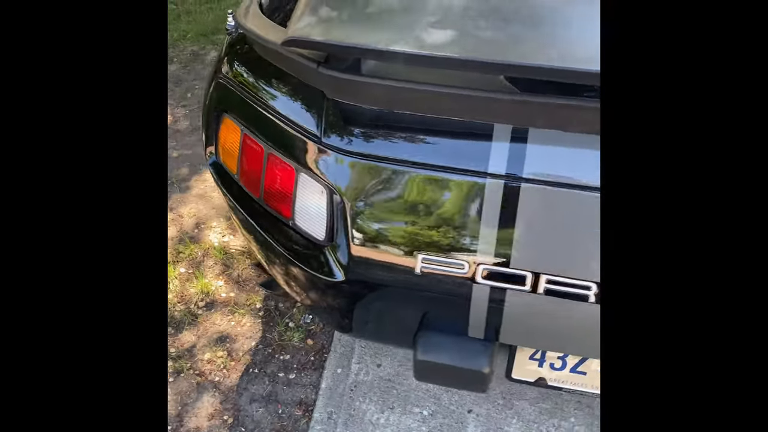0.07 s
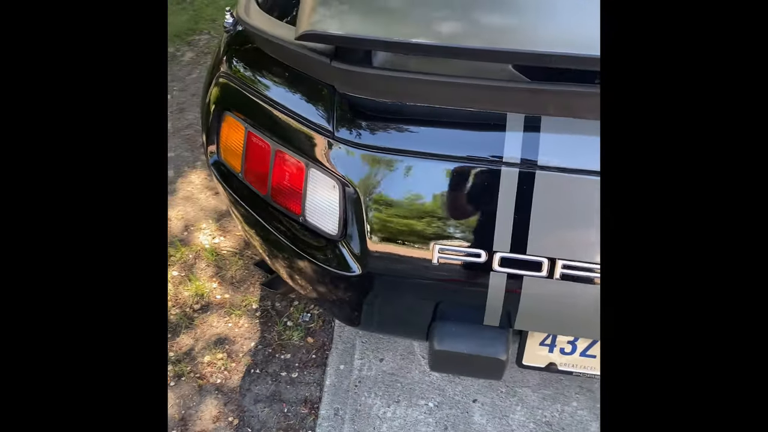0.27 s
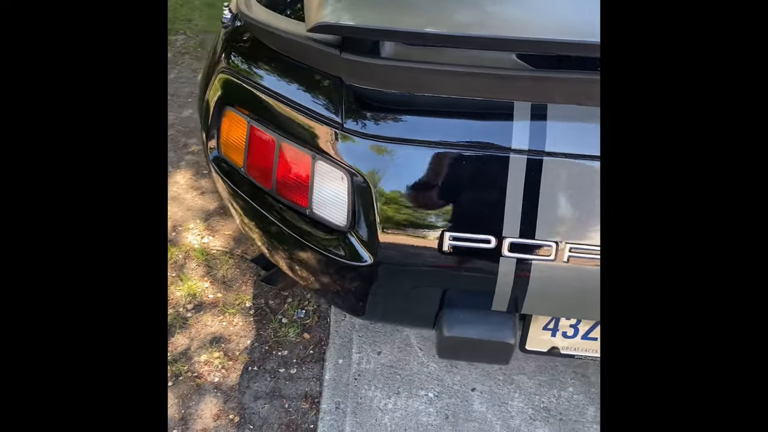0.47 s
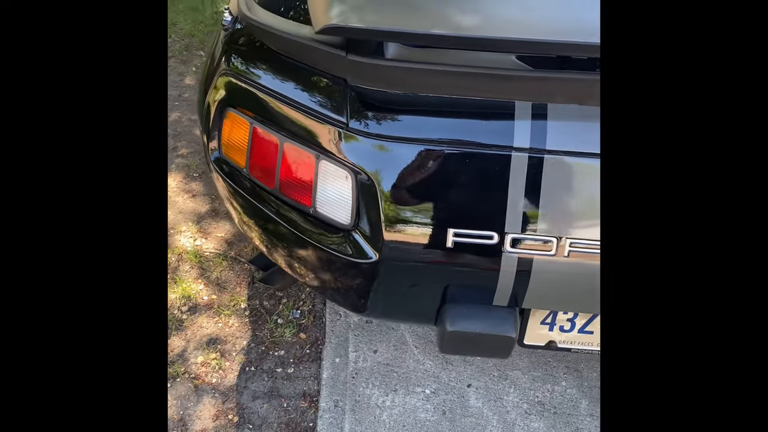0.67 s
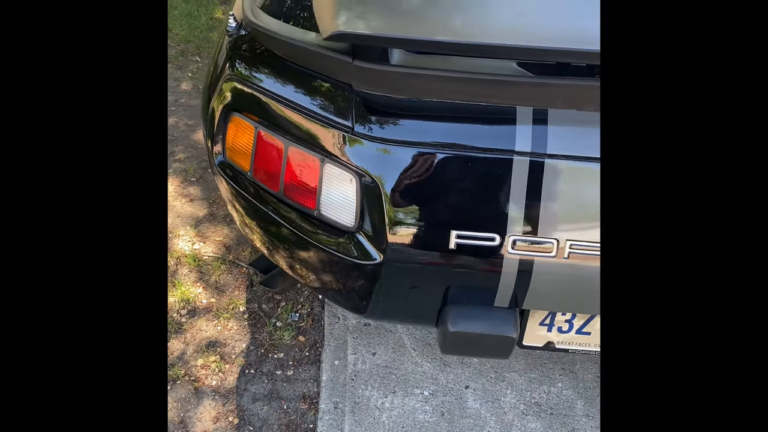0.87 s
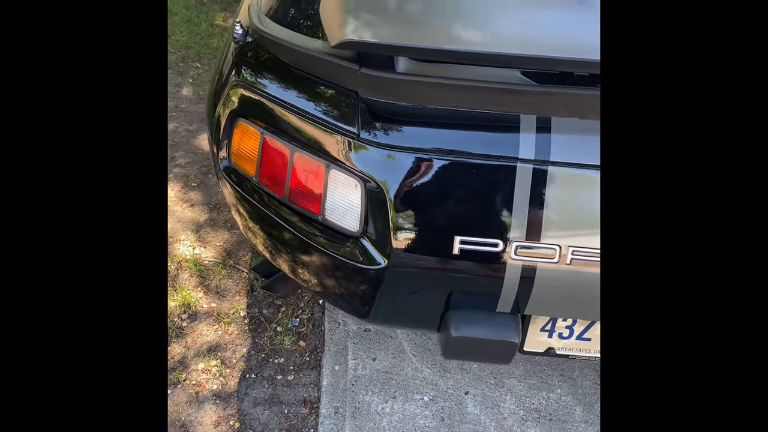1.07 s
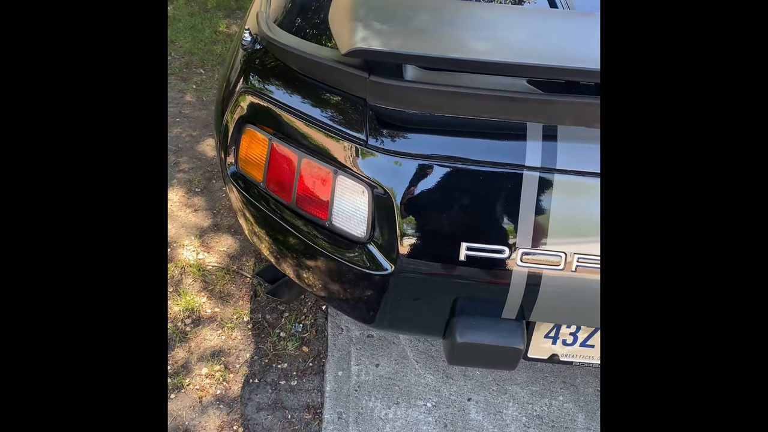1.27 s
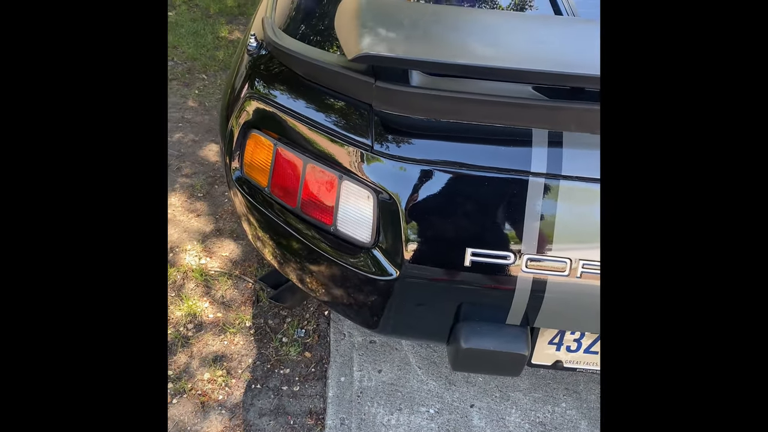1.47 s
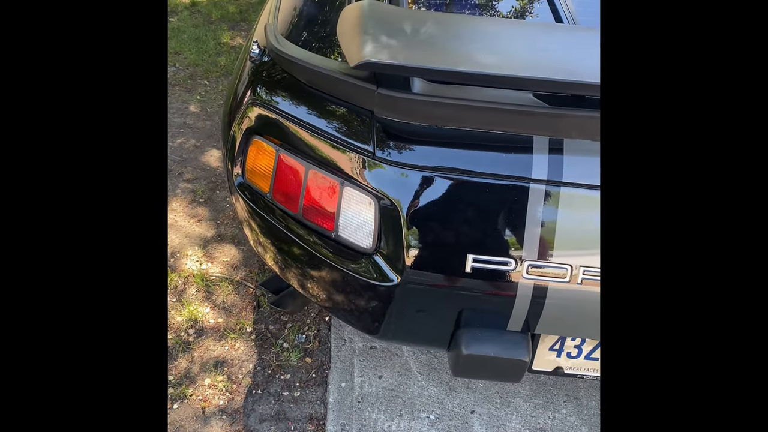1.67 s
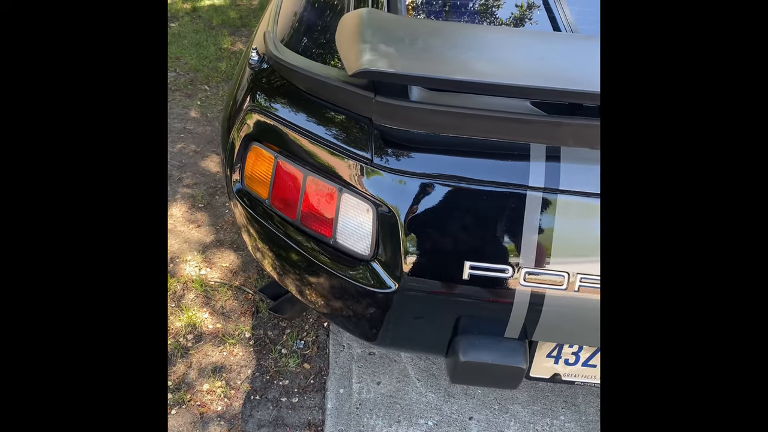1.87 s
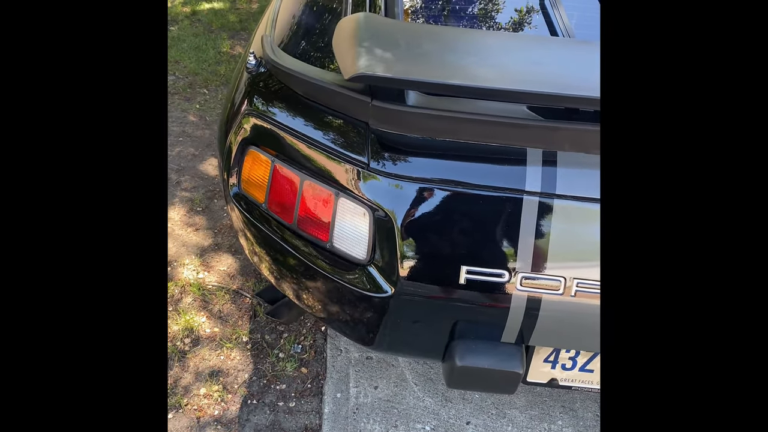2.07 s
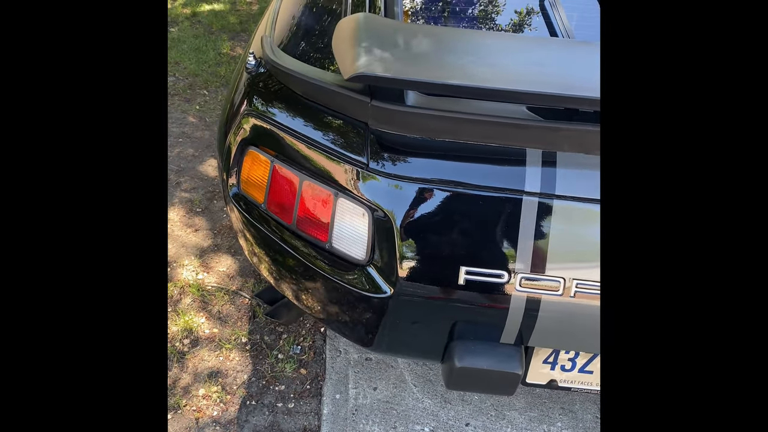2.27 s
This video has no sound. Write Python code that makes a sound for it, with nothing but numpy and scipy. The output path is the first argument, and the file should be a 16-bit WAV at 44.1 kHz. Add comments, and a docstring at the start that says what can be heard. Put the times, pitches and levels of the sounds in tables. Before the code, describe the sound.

A big eight-cylinder car engine idles throughout, deep and lumpy with a hollow hooting burble, soft hiss and faint whine; two short gritty shoe scuffs come early. Outdoors, handheld phone close behind the tailpipe.

```python
"""A V8 idles for 2.3 s, heard from just behind the parked car; its cycle of eight firings comes 8.3 times a second.
From the start, uneven firings ring the silencer (deep throb) and the tailpipe (hollow burble, a hoot per cycle).
With them panels buzz as shaken noise, the belt drive whines in thin tones, gas hisses as coloured noise
and, once per cycle, a valve ticks faintly as a decaying noise burst.
At 0.19 s and 0.63 s a shoe scuffs on grit, in dense tiny clicks with cracking stones; a lone stone cracks at 2.05 s."""
import sys
import numpy as np
from scipy import signal
from scipy.fft import rfft, irfft, next_fast_len
from scipy.io import wavfile
from scipy.ndimage import uniform_filter1d

SR = 44100
rng = np.random.default_rng(int(sys.argv[2]) if len(sys.argv) > 2 else 0)


def to_wav(sig):
    """Store sig (one row per channel, or 1-D mono) as 16-bit WAV at the path in sys.argv[1].

    Samples outside -1..1 are clipped; the rate is SR.
    """
    pcm = np.clip(np.atleast_2d(sig), -1, 1) * 32767
    pcm = np.round(pcm).astype(np.int16)
    wavfile.write(sys.argv[1], SR, pcm.T)  # frames by channels


N = 102664
T = np.arange(N) / SR
SIZE = next_fast_len(N + SR)
FREQS = np.maximum(np.arange(SIZE // 2 + 1) * SR / SIZE, 1e-3)  # Hz, kept off zero for the logarithm

# Engine speed. Each row: time in seconds, cycles of eight firings per second.
SPEED = [(0, 8.26), (.15, 8.25), (.35, 8.205), (.65, 8.265), (1, 8.26), (1.2, 8.22), (1.45, 8.27),
         (1.7, 8.34), (1.95, 8.285), (2.33, 8.3)]
# Cylinders in firing order. Each row: lag down the pipe in ms, push into the silencer in dB,
# sharp edge into the tailpipe in dB.
CYLINDERS = [(8.7, -23, 0), (8.9, 3.7, 4.6), (10.6, 3.2, .4), (4.9, -1.5, 3.8), (9.5, 3.7, -12.5),
             (10.3, -9.5, 5.2), (9, 6.9, -.5), (10.3, -13.6, -7.5)]
# Level balance of the two microphone ports. Each row: frequency in Hz, left minus right in dB.
PORT_BALANCE = [(300, .2), (450, 1.5), (700, -4.5), (1300, -8), (1900, -1.5), (2400, -0.6), (8000, .1)]


def undb(db):
    """Decibels to gain."""
    return 10 ** (np.asarray(db) / 20)


def level(x, db):
    """Scale to an rms level in dB."""
    return x * undb(db) / np.sqrt(np.mean(x ** 2))


def curve(points, t):
    """Straight lines through (s, value) points."""
    return np.interp(t, *np.array(points).T)


def across(points):
    """(Hz, value) points joined on a log-frequency axis."""
    hz, value = np.array(points).T
    return np.interp(np.log(FREQS), np.log(hz), value)


def through(x, response):
    """Filter by a frequency response."""
    return irfft(rfft(x, SIZE) * response, SIZE)[..., :N]


def resonances(table):
    """Summed response of steep resonances (Hz, width Hz, peak dB, polarity): each band-pass acts twice."""
    response = 0
    for hz, width_hz, db, polarity in table:
        band_pass = 1 / (1 + 1j * (FREQS ** 2 - hz ** 2) / (FREQS * width_hz))
        response = response + np.sign(polarity) * undb(db) * band_pass ** 2
    return response


def walk(rate_hz):
    """Random drift of unit rms: straight lines between rate_hz chance values per second."""
    step = int(SR / rate_hz)
    held = np.repeat(rng.standard_normal(N // step + 1), step)
    return level(uniform_filter1d(held, step)[:N], 0)


def pulses(times_s, sizes):
    """Clicks shared between neighbouring samples; those before zero wrap round and ring on into the start."""
    out = np.zeros(SIZE)
    whole = np.floor(times_s * SR).astype(int)
    part = times_s * SR - whole
    np.add.at(out, whole % SIZE, sizes * (1 - part))
    np.add.at(out, (whole + 1) % SIZE, sizes * part)
    return out


def pan(db):
    """Left and right gains for a left-minus-right level in dB."""
    return undb(np.array([[1], [-1]]) * db / 2)


def ports():
    """Phase and level differences of the two microphone ports, split evenly between left and right."""
    # Each row: frequency in Hz, phase by which left leads in radians.
    port_phase = [(30, -.03), (70, -.045), (130, -.13), (270, -.38), (395, -1), (540, -1.9), (720, -2)]
    phase = np.exp(np.array([[.5j], [-.5j]]) * across(port_phase))
    return phase * pan(across(PORT_BALANCE))


def exhaust(t, turns):
    """Each firing pushes the silencer, and its sharp edge rings the tailpipe; no two are quite alike."""
    # Resonances. Each row: frequency in Hz, width of one pass in Hz, peak gain in dB, polarity.
    silencer = [(46, 32, 14.5, -1), (67.8, 27.8, 37, 1), (79.63, 20.9, 41.5, -1), (113.66, 7, 31, 1),
                (141.2, 39, 13.5, 1)]
    tailpipe = [(144.5, 11.7, 17, -1), (181.9, 3.4, 13.5, 1), (217.6, 26.3, 22, 1), (254.5, 3.1, 25, -1),
                (270.9, 9, 30.5, 1), (278.6, 38, 16.5, -1), (318, 17, 20, -1), (400.3, 30.5, 15.5, -1),
                (539, 14, 6.5, 1), (681, 54, 0.5, 1), (724.6, 35, 0, 1)]
    push_scatter_db, edge_scatter_db, jitter_ms = 0.9, 1.2, 0.14
    count = len(CYLINDERS)
    firing = np.arange(np.ceil(turns[0] * count), turns[-1] * count).astype(int)
    lag_ms, push_db, edge_db = np.array(CYLINDERS)[firing % count].T
    chance = rng.standard_normal((3, len(firing)))
    times_s = np.interp(firing / count, turns, t) + (lag_ms + jitter_ms * chance[0]) / 1000
    push = pulses(times_s, undb(push_db + push_scatter_db * chance[1]))
    edge = pulses(times_s, undb(edge_db + edge_scatter_db * chance[2]))
    throb = through(push, ports() * resonances(silencer))
    burble = through(edge, ports() * resonances(tailpipe))
    return throb + burble


def pipe_ring(turns):
    """A pipe resonance, as a tone locked to the engine, swells to one hoot per cycle; shallow swells run together."""
    # Each row: time in seconds, level relative to peak_db in dB, depth of the swell from 0 to 1.
    ring_level = [(0, 1.5, 0.8), (.2, 1, 1), (.28, 1, 0.5), (.35, -9.5, 0.8), (.45, 2.5, 1), (.6, -5.5, 1),
                  (0.721, -2, 1), (.83, 2, .6), (1.05, 1.5, .7), (1.119, 4.5, .95), (1.3, -8, 0.4),
                  (1.429, 1.5, 1), (1.55, 5.5, .95), (1.67, 3, 1), (1.801, -1, 0.8), (1.92, 0.5, 0.9),
                  (2.141, 3, 1), (2.3, 4.5, .95)]
    peak_db, waver_db, wander_rad = -25, 0.6, 0.28
    order, loudest_turn = 48, 0.76  # multiple of the cycle rate; point of the cycle
    times_s, db, depth = np.array(ring_level).T
    dip = np.sin(np.pi * (turns - loudest_turn)) ** 2
    swell = 1 - np.clip(np.interp(T, times_s, depth), 0, 1) * dip
    tone = np.cos(2 * np.pi * order * turns + wander_rad * walk(25))
    gain = undb(peak_db + np.interp(T, times_s, db) + waver_db * walk(36))
    return through(tone * swell * gain, ports())


def panels(turns):
    """Panels and covers ring as narrow noise, each shaken hardest at its own point of the engine cycle."""
    # Each row: frequency in Hz, width of one pass in Hz, relative gain in dB, loudest point of the cycle 0-1.
    panel_modes = [(694.5, 110, 4, .87), (1036, 39, -6.5, .4), (1416.5, 55, 0, 0.3), (2770, 25, -15, .2),
                   (3006, 54, -10, 0)]
    # Each row: time in seconds, level relative to buzz_db in dB.
    panel_level = [(0, 0.5), (.45, -2.5), (.72, 2), (1.6, 2), (2.33, 0)]
    buzz_db, flutter_db, throb_db = -47, 0.6, 4.5
    buzz = 0
    for hz, width_hz, db, loudest_turn in panel_modes:
        shake_db = throb_db * np.cos(2 * np.pi * (turns - loudest_turn)) + flutter_db * walk(25)
        ringing = through(rng.standard_normal(N), resonances([(hz, width_hz, db, 1)]))
        buzz = buzz + undb(shake_db) * ringing
    return through(level(buzz, buzz_db) * undb(curve(panel_level, T)), ports())


def belt(turns):
    """Thin belt-drive whines at fixed multiples of the cycle rate, wavering in level and phase."""
    # Each row: multiple of the cycle rate, mean peak level in dB.
    whines = [(173.1, -63.5), (225.4, -62), (326.7, -79), (375.1, -72.5)]
    wander_rad, waver_db = 1, 4
    out = 0
    for order, db in whines:
        gain = undb(db + waver_db * walk(10))
        out = out + gain * np.cos(2 * np.pi * order * turns + wander_rad * walk(27))
    return out


def gas(turns):
    """Gas rush and engine-bay hiss: wide noise that puffs a little at the firing rate."""
    # Noise colours, shared by both sides and opposed between them.
    # Each row: frequency in Hz, relative density in dB per Hz.
    hiss_mid = [(30, -12.5), (46, 11.5), (70, 4.5), (150, 5), (400, 7.5), (500, -2.5), (720, -4),
                (950, -6.5), (1400, -9.5), (1700, -9), (2700, -13.5), (3700, -19.5), (5200, -20),
                (7700, -12.5), (8800, -48.5), (11200, -44.5), (12800, -15), (15500, -29)]
    hiss_side = [(30, -31.5), (150, -17), (400, 0), (500, 1), (720, 1), (1000, -4.5), (1400, -9),
                 (1900, -14.5), (2500, -8), (3700, -12.5), (4600, -14), (5500, -20), (7600, -12.5),
                 (9000, -14), (12900, -16), (13600, -22.5), (15500, -25)]
    mid_db, side_db, puff_depth, flutter_db = -40.5, -40, 0.045, 1.0
    puff = 1 + puff_depth * np.cos(2 * np.pi * len(CYLINDERS) * turns)
    puff = puff * undb(flutter_db * walk(60))
    mid = level(through(puff * rng.standard_normal(N), undb(across(hiss_mid))), mid_db)
    side = level(through(puff * rng.standard_normal(N), undb(across(hiss_side))), side_db)
    return through(np.array([mid + side, mid - side]), pan(across(PORT_BALANCE)))


def valve(turns):
    """One faint tick per engine cycle: a decaying noise burst through one resonance."""
    tick_turn, hz, width_hz, decay_s, rms_db = 0.47, 1450, 500, 0.0026, -68
    since_s = (turns - tick_turn) % 1 / curve(SPEED, T)
    tick = np.exp(-since_s / decay_s) * rng.standard_normal(N)
    response = resonances([(hz, width_hz, 0, 1)]) * pan(across(PORT_BALANCE))
    return level(through(tick, response), rms_db)


def grit(x, treble_db):
    """Colour a scrape with the resonances of the grit."""
    # Body and treble colours. Each row: frequency in Hz, relative density in dB per Hz.
    grit_body = [(700, -16), (1250, -10.5), (1500, -7.5), (2100, 3), (2700, 2.5), (3300, -1.5),
                 (3800, -10.5), (8000, -61)]
    grit_treble = [(3000, -36), (3850, -8.5), (4400, 8), (4950, -6), (5250, 1.5), (5900, -0.5), (6450, 10),
                   (7500, -10.5), (8400, -1.5), (9000, -37), (15000, -48)]
    base_treble_db = -4
    body = level(undb(across(grit_body)), 0)
    treble = level(undb(across(grit_treble)), 0)
    return through(x, body + undb(base_treble_db + treble_db) * treble)


def shoe():
    """A sole drags over grit: dense tiny clicks that swell and fade, and a few stones that crack."""
    # Each row: start, attack, hold and release in seconds, grain rms before swell and colour in dB,
    # left minus right in dB, relative treble in dB.
    scuffs = [(0.186, 0.0054, 0.017, 0.028, -39.5, 7.5, 1),
              (0.632, 0.078, 0.017, 0.057, -43.5, -9.5, -16.5)]
    # Stones cracking under the sole. Each row: start in seconds, level before colour in dB,
    # left minus right in dB, relative treble in dB.
    cracks = [(0.193, -23, 4.5, -7.5), (0.2038, -27, 0.5, -3.5), (.207, -28, 8, 6),
              (0.6648, -31.5, -3, -14), (0.6964, -36, 0.5, -17), (0.7087, -29.5, -1.5, -12.5),
              (.7125, -27.5, 2, -25), (0.724, -28.5, 0.5, -27.5), (2.048, -38, 1, -5)]
    grains_per_s, grain_spread_db, swell_power, catch_db, crack_decay_s = 12000, -0.5, 0.9, 1.5, 0.00049
    out = np.zeros((2, N))
    for start_s, attack_s, hold_s, release_s, db, pan_db, treble_db in scuffs:
        grains = (rng.random(N) < grains_per_s / SR) * rng.standard_normal(N)
        grains = grains * undb(grain_spread_db * np.minimum(rng.exponential(size=N), 4))
        corners_s = np.cumsum([start_s, attack_s, hold_s, release_s])
        swell = np.interp(T, corners_s, [0, 1, 1, 0]) ** swell_power
        swell = swell * undb(catch_db * walk(200))
        out += pan(pan_db) * grit(level(grains, db) * swell, treble_db)
    for start_s, db, pan_db, treble_db in cracks:
        decay = (T >= start_s) * np.exp(-np.abs(T - start_s) / crack_decay_s)
        snap = decay * rng.standard_normal(N)
        out += pan(pan_db) * grit(undb(db) * snap, treble_db)
    return out


def scene():
    """The engine's rotation, in cycles, drives every engine layer; the shoe is added."""
    lead = int(0.5 * SR)  # firings before zero, still ringing at the start
    t = np.arange(-lead, N) / SR
    turns = np.cumsum(curve(SPEED, t)) / SR
    turns = turns - turns[lead]
    heard = turns[lead:]
    engine = exhaust(t, turns) + pipe_ring(heard) + panels(heard) + belt(heard)
    return engine + gas(heard) + valve(heard) + shoe()


def record(dry):
    """The phone cuts the top: a steep elliptic low-pass."""
    top_hz, ripple_db, stop_db = 15800, 0.2, 80
    return signal.sosfilt(signal.ellip(8, ripple_db, stop_db, top_hz, fs=SR, output="sos"), dry)


dry = scene()
out = record(dry)
to_wav(out)
```